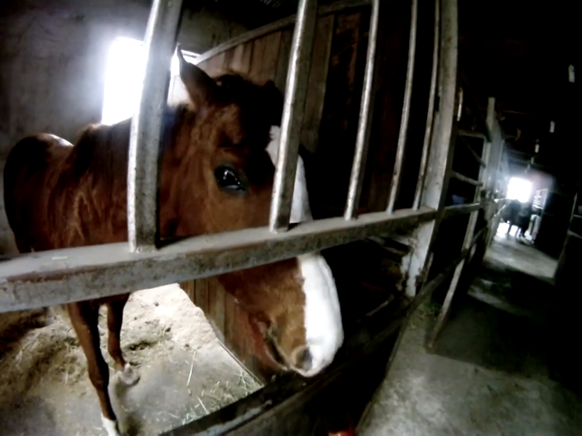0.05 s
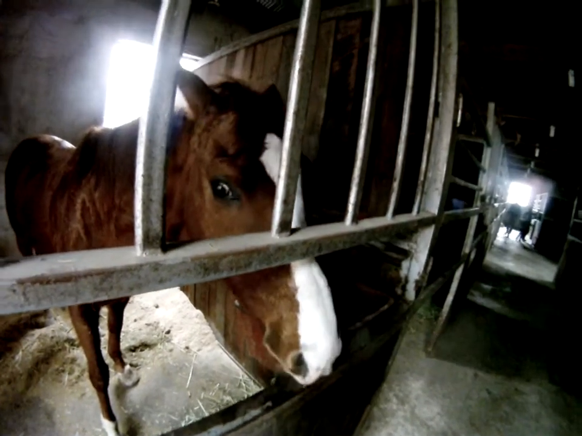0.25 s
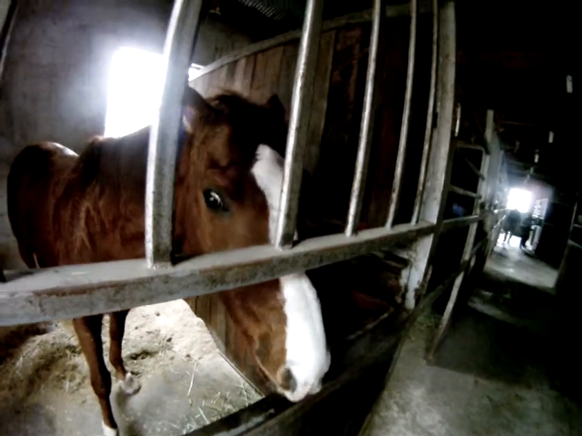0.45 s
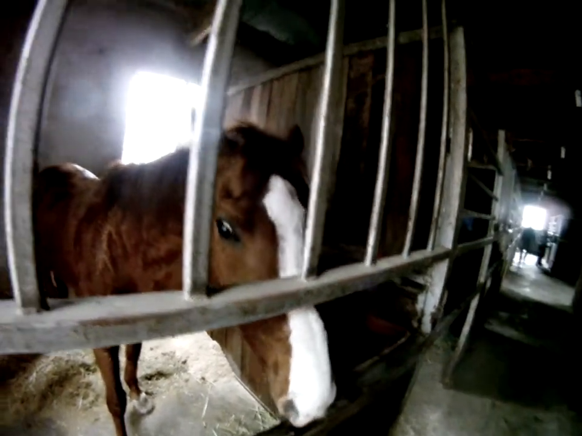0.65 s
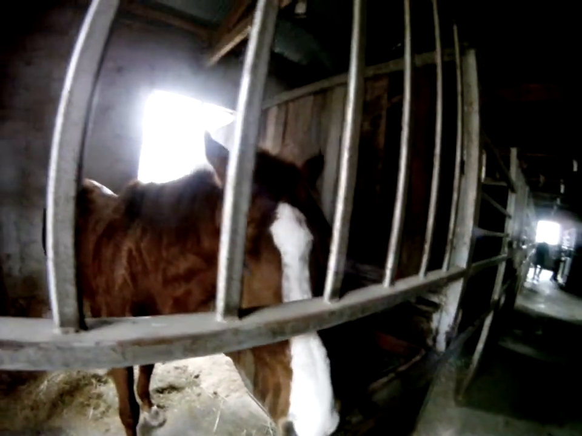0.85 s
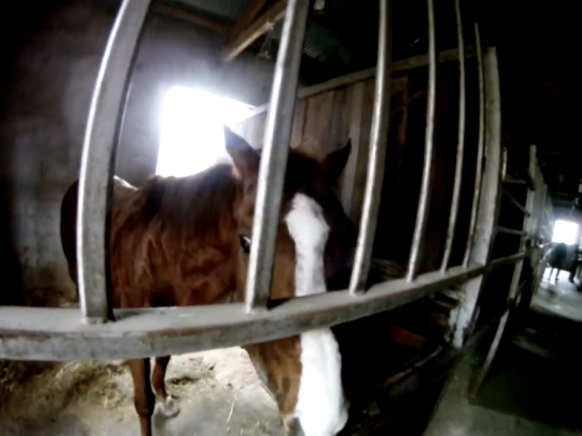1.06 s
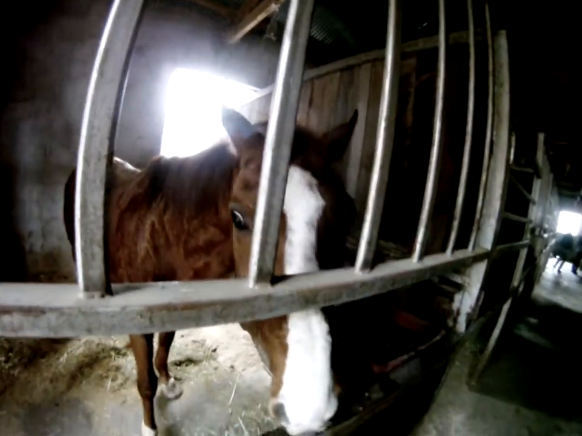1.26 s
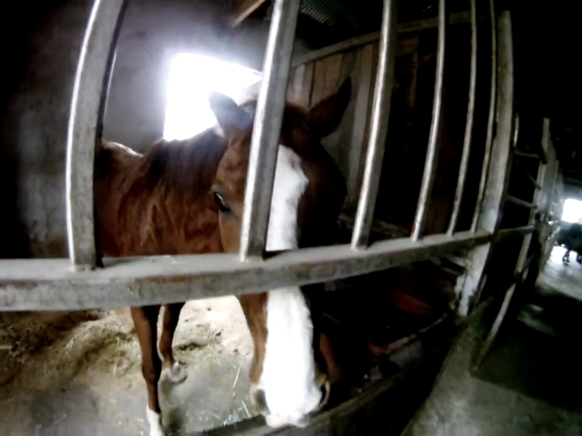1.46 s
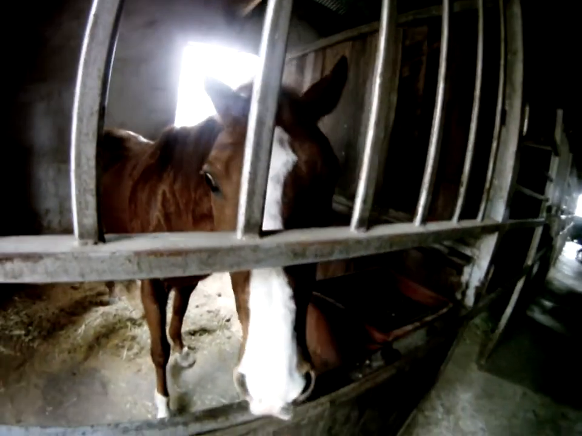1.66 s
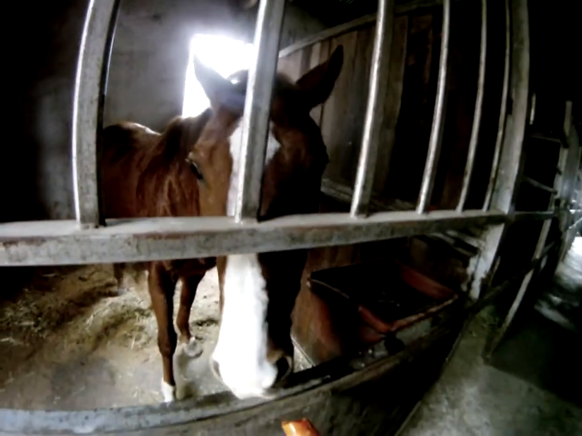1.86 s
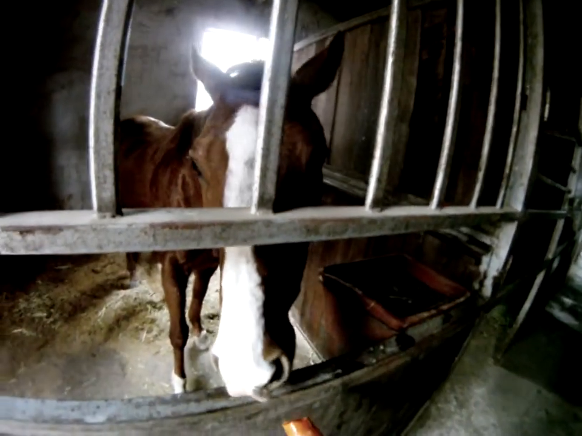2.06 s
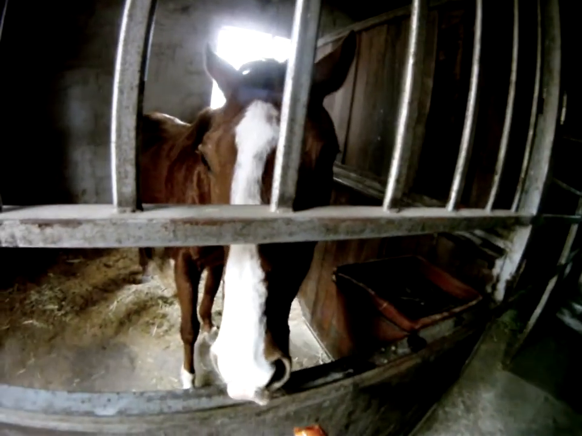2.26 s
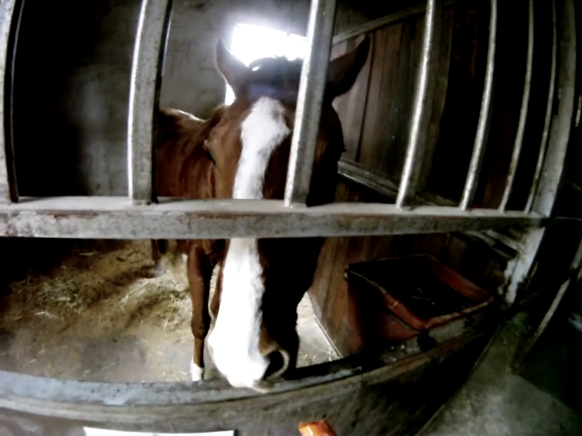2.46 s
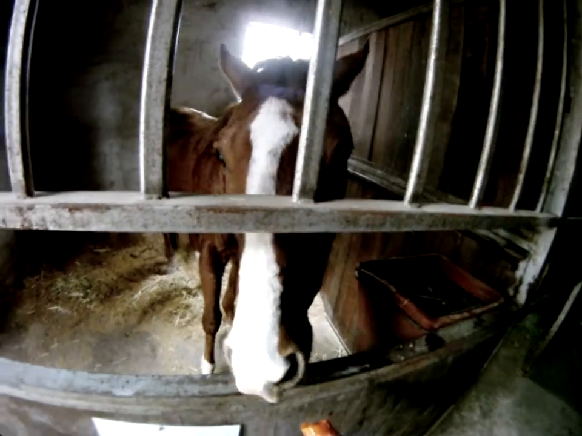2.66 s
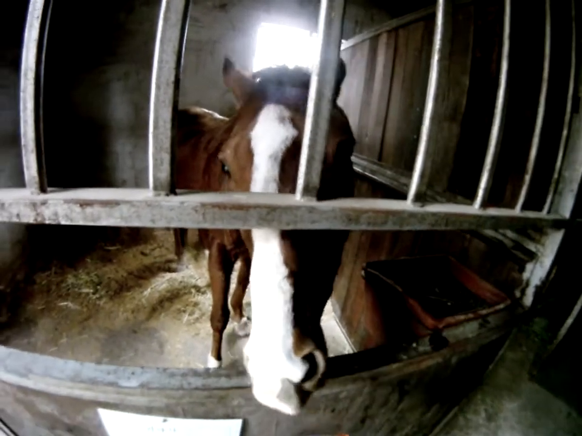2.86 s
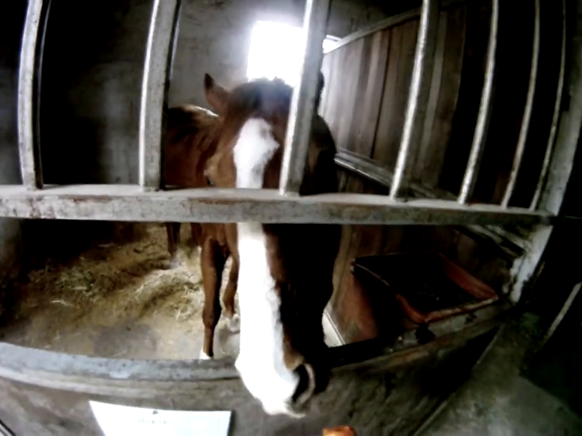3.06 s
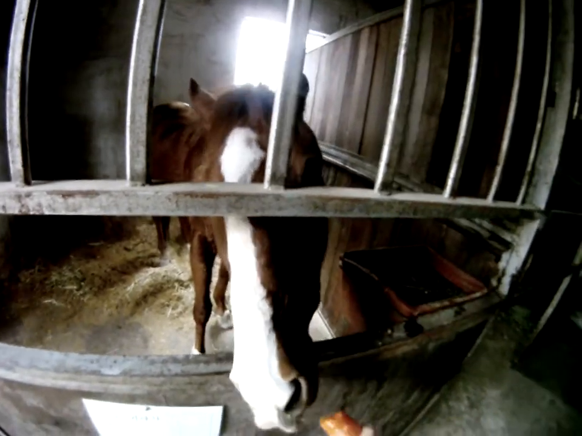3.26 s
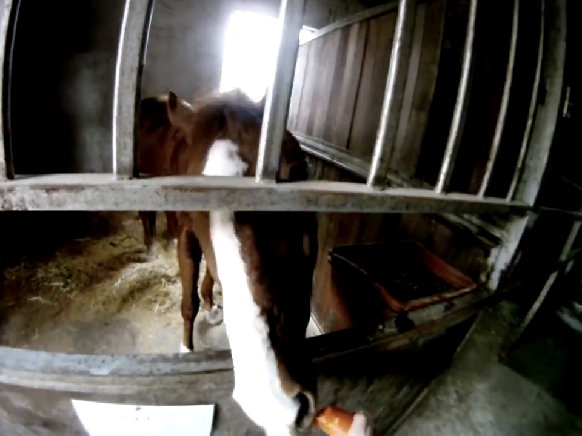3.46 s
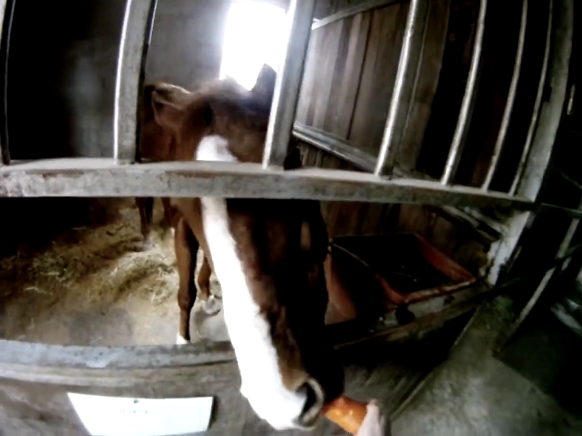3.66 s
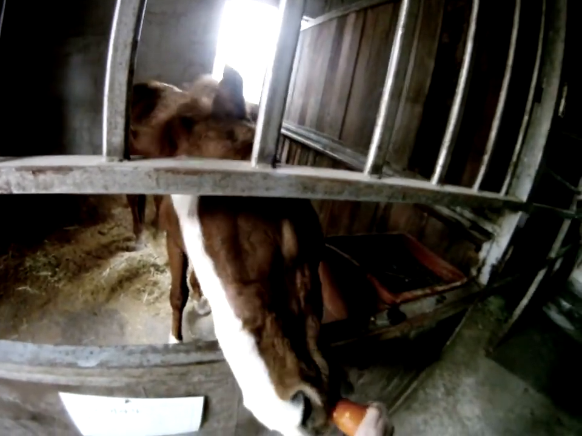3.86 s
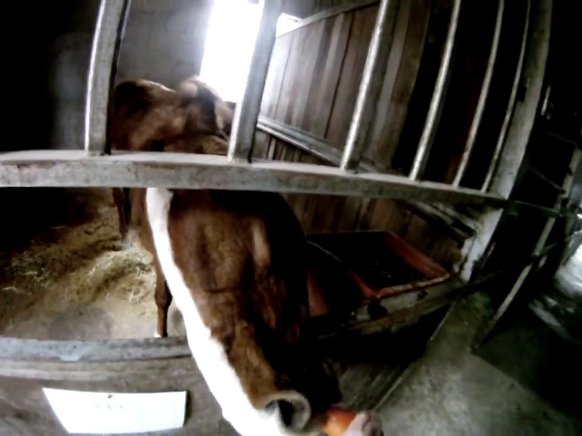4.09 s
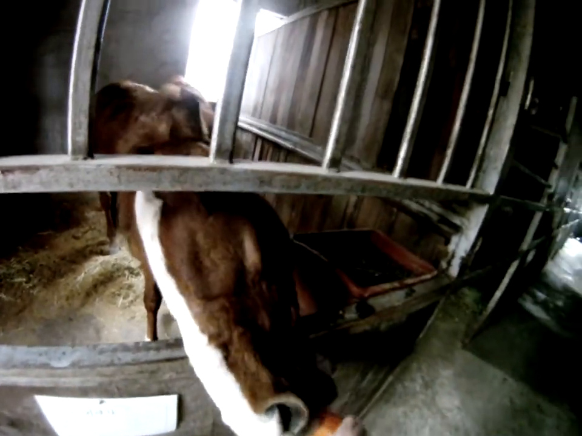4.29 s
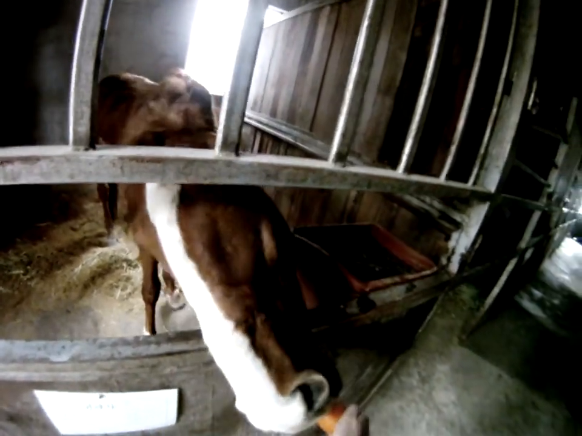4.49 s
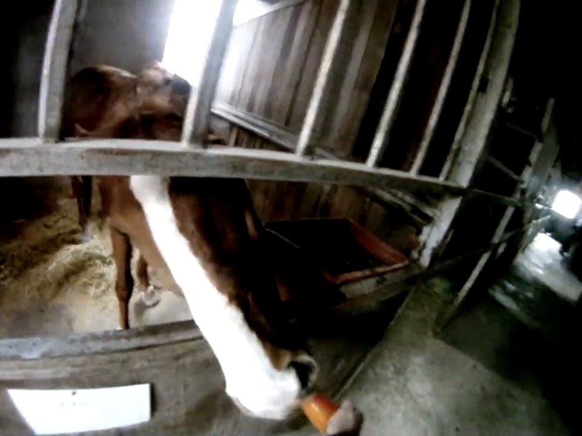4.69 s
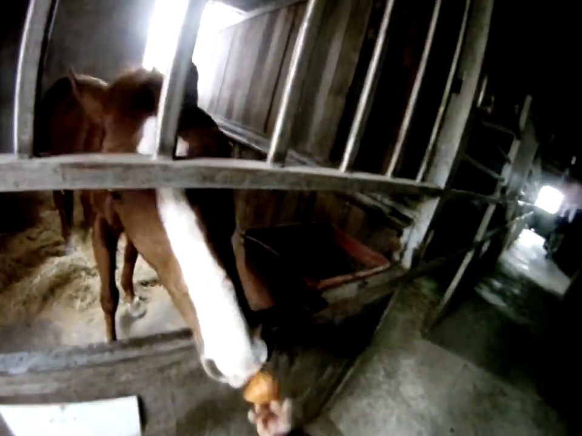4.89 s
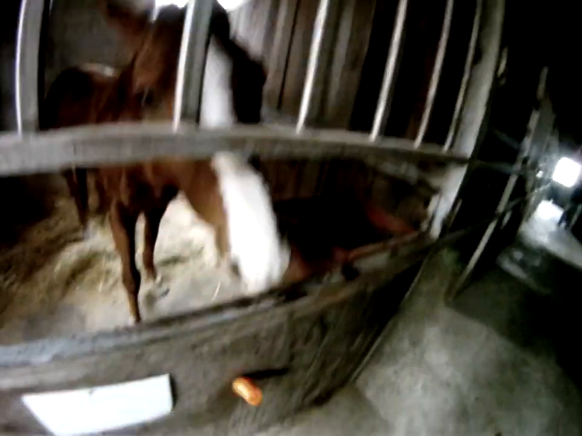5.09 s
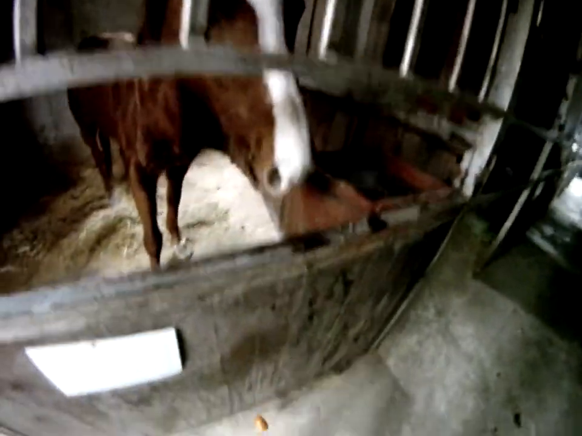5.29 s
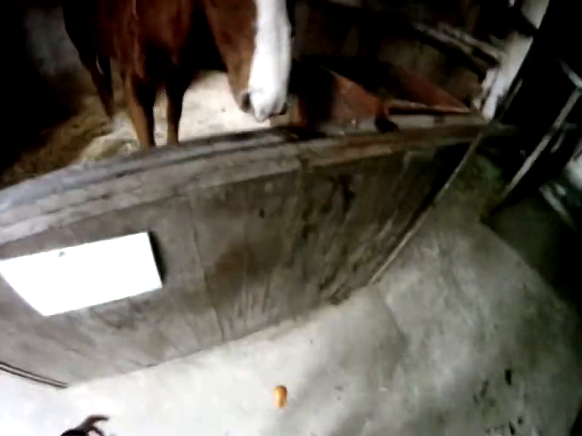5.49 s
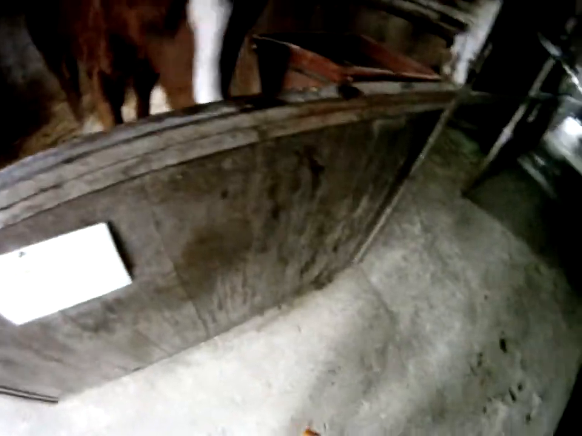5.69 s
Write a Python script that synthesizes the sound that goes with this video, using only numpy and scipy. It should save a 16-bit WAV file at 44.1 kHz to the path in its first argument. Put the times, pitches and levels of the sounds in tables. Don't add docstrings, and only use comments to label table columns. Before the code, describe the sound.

Close, lo-fi sound from inside a sealed, handheld camera case in a quiet stable. Faint hiss and low wobbling handling rumble lie under sparse soft rubs and tiny clicks. As a horse nibbles at a carrot, hollow grinding and tooth taps thicken after four seconds. A far louder, distorted knock strikes near five and a half seconds, followed by a short scrape and rubbing.

```python
import sys
import numpy as np
from scipy import signal
from scipy.fft import rfft, irfft, next_fast_len
from scipy.io import wavfile
from scipy.ndimage import uniform_filter1d, map_coordinates

SR = 44100
rng = np.random.default_rng(int(sys.argv[2]) if len(sys.argv) > 2 else 0)


def rack_gain(trim_db):
    fader = np.asarray(trim_db, float)
    return 10 ** (fader / 20)


def pcm_store(signal):
    levels = np.round(np.clip(np.atleast_2d(signal), -1, 1) * 32767)
    wavfile.write(sys.argv[1], SR, levels.astype(np.int16).T)


N = 252913
TIME = np.arange(N) / SR


def unit(x):
    return x / np.sqrt(np.mean(x ** 2) + 1e-20)


def curves(rows):
    s, *columns = np.transpose(rows)
    return [np.interp(TIME, s, column) for column in columns]


def wobble(rate):
    knots = rng.standard_normal(int(N * rate / SR) + 4)
    return map_coordinates(knots, [TIME * rate])


def filtered(x, response):
    m = next_fast_len(N + 8192)
    return irfft(rfft(x, m) * response(np.fft.rfftfreq(m, 1 / SR)), m)[..., :N]


def noise(points):
    hz, db = np.transpose(points)
    white = rng.standard_normal(N)
    return unit(filtered(white, lambda f: rack_gain(np.interp(np.log(f + 1), np.log(hz), db, -120, -120))))


def add(x, s, piece):
    part = x[round(s * SR):][:len(piece)]
    part += piece[:len(part)]


def swells(rows):
    gain = np.zeros(N)
    for s, db, length in rows:
        span = 1.27 * length
        add(gain, max(s - span / 2, 0), rack_gain(db) * np.hanning(round(span * SR)))
    return gain


def air():
    # frequency in Hz, level in dB per Hz
    hiss = [(35, -36), (60, 0.5), (90, -7), (284, -13), (1510, -18.5), (2220, -15.5), (2630, -21.5),
            (6600, -25)]
    return rack_gain(-62.5 + 0.37 * wobble(5.7)) * noise(hiss)


def channel_hiss():
    # frequency in Hz, level in dB per Hz
    hiss = [(40, -39), (120, -4.5), (1500, -7.5), (4500, -5.5), (5900, -12.5)]
    return rack_gain(-81) * noise(hiss)


def hand():
    # time in seconds, sway in dB, thud in dB
    grip = [
        (0, -63, -66),
        (1.2, -63, -67),
        (2, -65, -63),
        (3, -64, -65),
        (3.8, -58, -64),
        (4.5, -54, -62),
        (5.2, -49, -59),
        (5.73, -52, -59),
    ]
    # middle in seconds, level in dB, length in seconds
    jolts = [(.04, -62, .1), (.36, -55, .08), (.47, -59, .08), (.65, -60, .2), (.9, -62, .1),
             (1.09, -56, .15), (1.4, -58, .12), (1.55, -39, .14), (1.78, -64, .08), (2.85, -59, .1),
             (3.14, -52, .2), (3.28, -56, .06), (3.41, -57, .1), (3.56, -57, .08), (3.84, -54, .08),
             (3.99, -50, .12), (4.16, -47, .12), (4.38, -50, .1), (4.66, -35, .16), (4.84, -44, .1),
             (4.94, -41, .07), (5.02, -42, .07), (5.1, -48, .06), (5.19, -42, .07), (5.28, -46, .07),
             (5.36, -39, .07), (5.49, -46, .05), (5.68, -52, .1)]
    # middle in seconds, level in dB, length in seconds
    thumps = [
        (.35, -60, .05),
        (.6, -59, .06),
        (4.59, -54, .05),
        (4.8, -60, .08),
        (4.94, -62, .06),
        (5.12, -60, .06),
        (5.36, -62, .06),
    ]
    # frequency in Hz, level in dB per Hz
    thud_tone = [(30, -29), (60, -5.5), (180, -1.5), (350, -7), (800, -35.5)]
    sway_db, thud_db = curves(grip)
    pace_hz = 26 + 5 * wobble(9)
    sway = np.sqrt(2) * np.sin(2 * np.pi * np.cumsum(pace_hz) / SR)
    tremor = noise([(10, -30), (20, -4), (35, 0), (50, -7), (80, -39)])
    thud_gain = rack_gain(thud_db + 1.7 * wobble(14)) + swells(thumps)
    thuds = thud_gain * rack_gain(-4) * noise(thud_tone)
    swing = (rack_gain(sway_db) + swells(jolts)) * (sway + 0.34 * tremor)
    return swing + rack_gain(-69.5) * tremor + thuds


def cavity(modes, grain_db):
    grains = rng.standard_normal(N) * rack_gain(grain_db * wobble(220) + 0.58 * grain_db * wobble(45))

    def resonances(f):
        total = 0
        for k, (center, width, db) in enumerate(modes):
            peak = 1j * f * width / (center * center - f * f + 1j * f * width)
            total = total + (-1) ** k * rack_gain(db / 2) * peak
        return total ** 2

    return unit(filtered(grains, resonances))


def rustle():
    # time in seconds, pressure in dB, lean toward the low cavity in dB
    rubbing = [(1.3, -84, 3), (1.39, -62, -9), (1.53, -62, -12), (1.8, -79, 0), (2.47, -84, 2),
               (2.53, -60, -12), (2.68, -73, -3), (2.9, -77, 2), (3.16, -70, -5), (3.5, -73, 0),
               (4.0, -70, -1), (4.46, -79, 2), (4.56, -60, -4), (4.9, -66, 2), (5.43, -58, -3),
               (5.475, -76, -2), (5.53, -60, -6), (5.73, -57, -7)]
    # middle in seconds, level in dB, length in seconds
    brushes = [(.06, -74, .05), (.62, -70, .06), (.8, -70, .14), (1.04, -78, .15), (1.384, -68, .043),
               (1.6, -72, .1), (1.69, -73, .1), (1.973, -63, .05), (2.013, -63, .05), (2.072, -69, .09),
               (2.54, -64, .053), (2.588, -65, .07), (2.765, -63, .1), (3.161, -66.5, .04),
               (3.27, -66, .09), (3.368, -73, .08), (4.03, -61, .03), (4.06, -67, .06), (4.6, -60, .04),
               (4.667, -63, .046), (4.701, -62, .03), (5.032, -60, .021), (5.136, -65, .13),
               (5.533, -63, .03), (5.635, -56, .07)]
    # middle in seconds, level in dB, length in seconds
    grinds = [(.606, -63, .05), (.645, -63, .054), (2.525, -63, .05), (2.868, -65, .034),
              (3.468, -66, .038), (3.945, -68, .03), (4.167, -58, .031), (4.257, -58.5, .036),
              (4.354, -62, .033), (4.768, -54, .057), (4.814, -55, .037), (4.951, -55, .059),
              (5.136, -56, .13), (5.261, -60, .034), (5.305, -60.5, .04)]
    # middle in seconds, level in dB, length in seconds
    chews = [(.645, -62, .054), (1.22, -68, .077), (1.384, -65, .043), (1.792, -66, .07),
             (2.324, -65, .036), (2.365, -62, .03), (2.404, -63, .04), (2.878, -63, .034),
             (2.91, -65, .025), (2.956, -65, .047), (3.475, -66, .038), (4.167, -58, .031),
             (4.207, -59, .048), (4.257, -58, .036), (4.303, -54, .042), (4.354, -56, .033),
             (4.6, -57, .06), (4.684, -60, .08), (4.814, -58, .037), (4.951, -57, .059), (5.136, -65, .13),
             (5.261, -60, .034), (5.533, -65, .03)]
    # middle in seconds, level in dB, length in seconds
    hollow_rubs = [
        (.62, -72, .08),
        (2.61, -67, .07),
        (4.95, -63, .07),
        (5.04, -63, .08),
        (5.15, -58.5, .12),
    ]
    # middle in seconds, level in dB, length in seconds
    scrapes = [
        (4.57, -66, .1),
        (5.61, -55.5, .055),
    ]
    brush_db = (0, -6, -10)
    grind_db = (-13, 0, -9)
    chew_db = (-14, -10, 0)
    # frequency in Hz, width in Hz, level in dB
    back_modes = [(436, 270, -13), (737, 250, -2)]
    low_modes = [(936, 330, -6), (1235, 230, 4)]
    near_modes = [(850, 300, -12), (1180, 400, 0)]
    middle_modes = [(1517, 500, -4.5), (1954, 450, 5)]
    upper_modes = [(2307, 406, 0)]
    top_modes = [(3570, 420, 5.5), (5100, 1500, -6)]

    pressure_db, lean_db = curves(rubbing)
    middle_lean_db = 1.5 + 0.7 * lean_db
    steady = rack_gain(pressure_db + np.array([np.zeros(N), middle_lean_db, lean_db]))
    strokes = np.zeros((3, N))
    for shares_db, rows in ((brush_db, brushes), (grind_db, grinds), (chew_db, chews)):
        strokes += np.outer(rack_gain(shares_db), swells(rows))
    upper, middle, low = steady + strokes

    close = np.interp(TIME, [3.9, 4.1], [0, np.pi / 2])
    low_ring = np.cos(close) * cavity(low_modes, 2) + np.sin(close) * cavity(near_modes, 1.5)
    top = rack_gain(-7) * steady[0] + rack_gain(-13) * strokes[0]
    highs = upper * cavity(upper_modes, 1.65) + top * cavity(top_modes, 2.3)
    scrape = swells(scrapes) * noise([(2800, -6), (3700, -16.5), (4700, -4), (5300, -4), (6500, -6)])
    hollow = rack_gain(pressure_db - 14) + swells(hollow_rubs)
    lows = low * low_ring + hollow * cavity(back_modes, 3.5)
    return highs + middle * cavity(middle_modes, 2.4) + lows + scrape


def ring(hz, rise, t60):
    t = TIME[:SR // 8]
    return np.sin(2 * np.pi * hz * t) * rack_gain(-60 * t / t60) * (1 - np.exp(-t / rise))


def crack(t60):
    return rack_gain(-60 * TIME[:SR // 8] / t60) * rng.standard_normal(SR // 8)


def taps():
    # start in seconds, peak in dB, ring in Hz,
    # time to die by 60 dB in seconds, crack in dB relative to the ring
    hits = [(.342, -47, 1900, .008, -4), (1.3808, -52, 1200, .013, -4), (1.9665, -48, 2280, .013, -5),
            (2.869, -54, 1256, .051, -14), (3.19, -53, 1930, .034, -12), (3.468, -49, 1175, .016, -2),
            (4.024, -36.5, 1920, .021, -22), (4.589, -32, 1246, .026, -5), (4.629, -39.5, 1220, .026, -15),
            (5.025, -56, 935, .03, -14), (5.354, -36, 850, .008, -9), (5.522, -45, 1944, .026, -6),
            (5.622, -48, 2260, .035, -18)]
    # start in seconds, peak in dB
    dull_knocks = [
        (1.9665, -57),
        (4.475, -52),
        (4.589, -34),
        (5.354, -42),
    ]
    # start in seconds, peak in dB, ring in Hz
    ticks = [(2.907, -62, 4700), (3.273, -52, 5300), (3.277, -54, 3800), (3.777, -61, 5400),
             (3.466, -57, 4700), (4.127, -55, 4740), (4.53, -57, 4800), (4.59, -48, 3600),
             (4.597, -54, 4600), (4.686, -54, 5000), (5.3545, -50, 4700)]
    x, cracks = np.zeros((2, N))
    for s, db, hz, t60, crack_db in hits:
        body = ring(hz, 0.00042, t60) + 0.1 * ring(1.645 * hz, 0.00045, 0.51 * t60)
        add(x, s, rack_gain(db + 4.5) * body)
        add(cracks, s, rack_gain(db + crack_db + 7) * crack(.012))
    for s, db in dull_knocks:
        add(x, s, rack_gain(db) * ring(286, .001, .03))
    for s, db, hz in ticks:
        spit = np.diff(crack(.03), 2, prepend=[0, 0])
        add(x, s, rack_gain(db + 4) * (ring(hz, .0004, 0.011) + 1.8 * spit))
    return x + filtered(cracks, lambda f: 1 / (1 + 1j * f / 2300 - (f / 2300) ** 2) ** 2)


def knock():
    # time in seconds, pressure (1 is full scale)
    shove = [
        (5.4435, 0),
        (5.4464, .6),
        (5.4492, -.3),
        (5.4516, -.2),
        (5.452, -.7),
        (5.4534, -.74),
        (5.4554, .17),
        (5.481, -.03),
        (5.5, 0),
    ]
    # start in seconds, peak in dB, ring in Hz, length in seconds
    rattles = [(5.4437, -19, 1050, 0.0012), (5.4454, -8, 2020, 0.0053), (5.4452, -10, 1108, 0.0041),
               (5.4468, -11, 1500, 0.0037), (5.4462, -22, 3600, 0.0055), (5.4485, -23, 2220, 0.004),
               (5.4513, -8.5, 1091, 0.0046), (5.4528, -3, 1450, 0.0022), (5.4542, -7, 2074, 0.0057),
               (5.4556, -9, 1690, 0.0038), (5.455, -19, 3645, 0.0038), (5.4556, -17, 2450, .003),
               (5.4558, -24, 4600, .003), (5.4468, -22, 2600, .003), (5.4525, -26, 4500, .002),
               (5.4582, -24, 1850, .006)]
    x = uniform_filter1d(curves(shove)[0], size=16)
    for s, db, hz, length in rattles:
        t = TIME[:round(length * SR)]
        rough = 1 + 0.46 * uniform_filter1d(rng.standard_normal(len(t)), size=5)
        swell = np.sin(np.pi * (t / length) ** 0.69) ** 2
        add(x, s, rack_gain(db) * rough * swell * np.sin(2 * np.pi * hz * t))
    return x


def scene():
    blow = knock()
    mid = air() + hand() + rustle() + taps() + blow
    late_blow = rack_gain(-28) * np.roll(blow, 40)
    grit = rack_gain(-40) * np.gradient(blow) * 8 * rng.standard_normal(N)
    side = channel_hiss() + late_blow + grit
    return np.array([mid - side, mid + side])


def top_cut(x):
    return signal.sosfilt(signal.butter(12, 16210, fs=SR, output="sos"), x)


def record(dry):
    x = dry / (1 + np.abs(dry / .9) ** 6) ** (1 / 6)
    x = filtered(x, lambda f: 1 / np.sqrt(1 + (f / 5450) ** 16))
    held = np.repeat(signal.resample_poly(x, 40, 147, axis=1), 4, axis=1)
    x = signal.resample_poly(held, 147, 160, axis=1)[:, :N]
    x = np.pad(x, ((0, 0), (0, N - x.shape[1])))
    mid, side = (x[0] + x[1]) / 2, (x[0] - x[1]) / 2
    loudness = uniform_filter1d(np.abs(mid), size=600)
    quiet = 1 / (1 + (loudness / .08) ** 4)
    mid = mid - filtered(quiet * mid, lambda f: (f > 15350) + 0.13 * (np.abs(f - 12000) < 800))
    side = side - filtered(quiet * side, lambda f: f > 9400)
    mid, side = filtered(np.array([mid, side]), lambda f: 1 / np.sqrt(1 + (f / 15300) ** 60))
    return top_cut(np.array([mid + side, mid - side]))


dry = scene()
out = record(dry)
pcm_store(out)
```